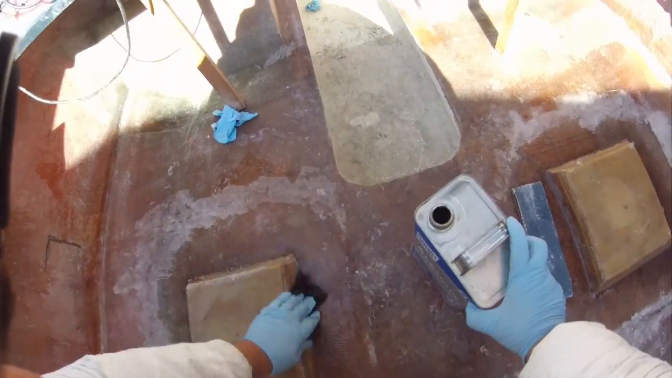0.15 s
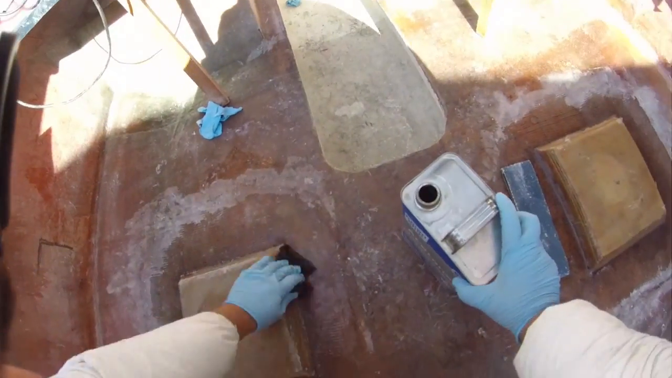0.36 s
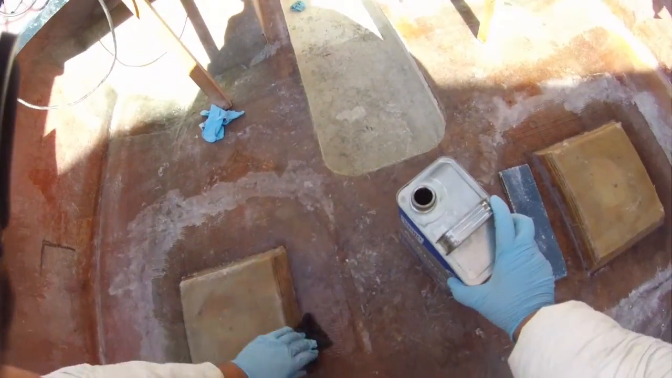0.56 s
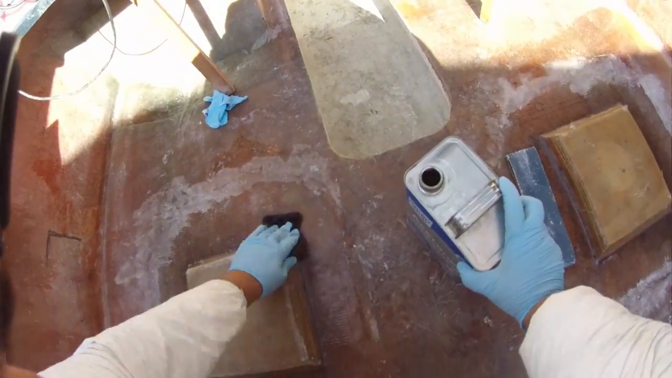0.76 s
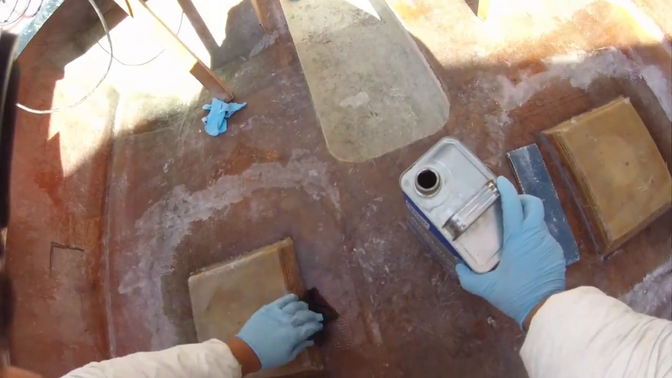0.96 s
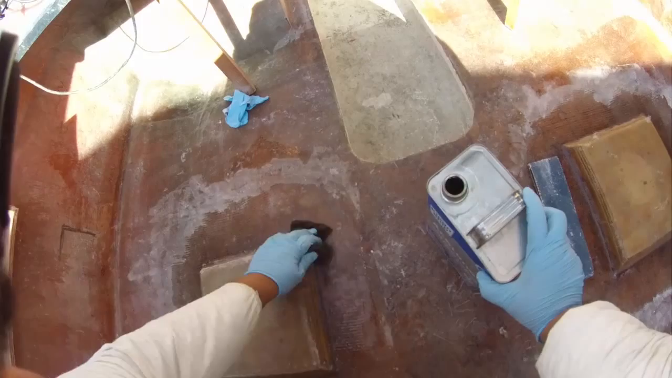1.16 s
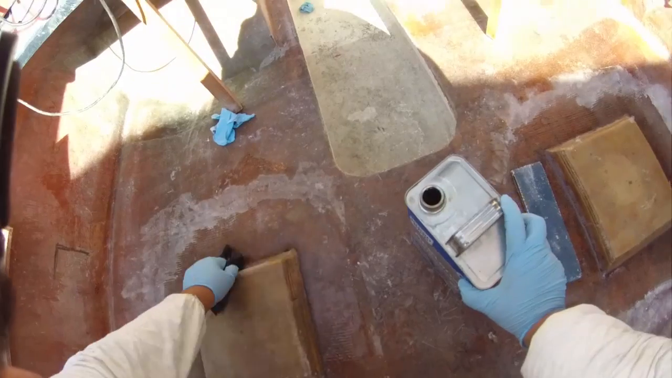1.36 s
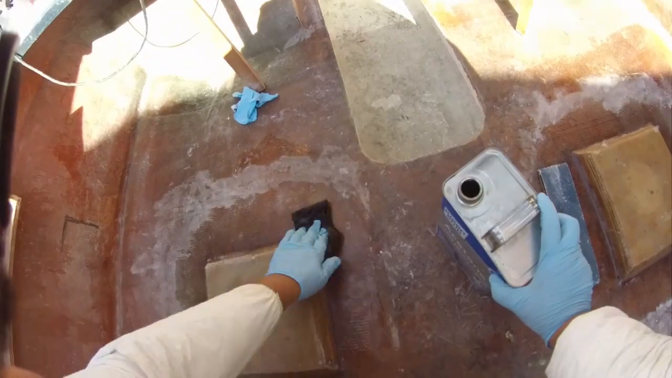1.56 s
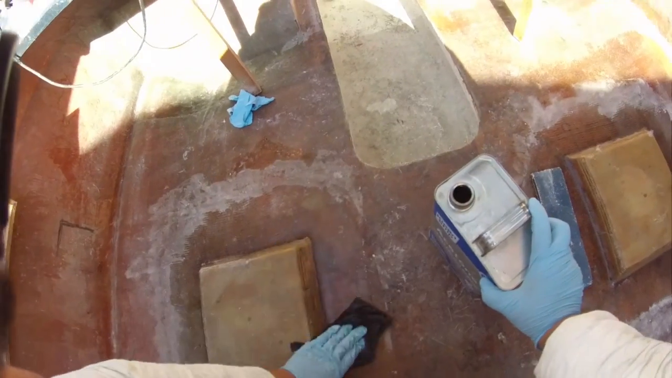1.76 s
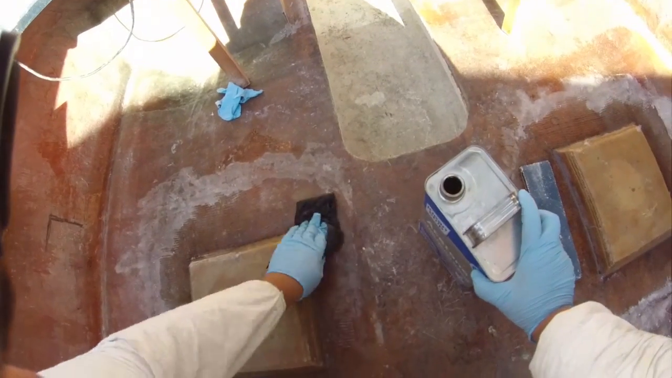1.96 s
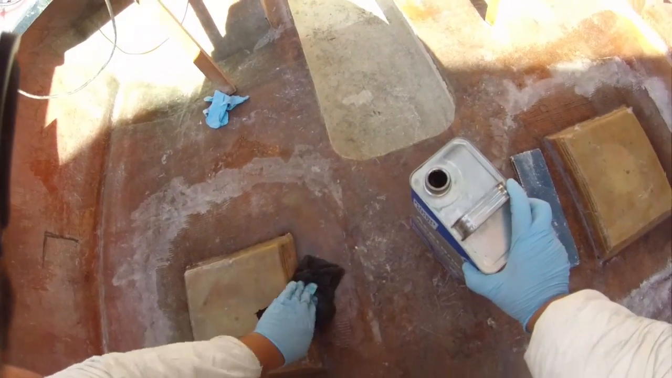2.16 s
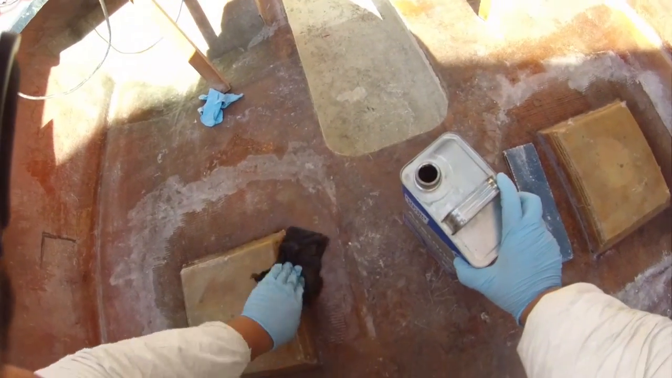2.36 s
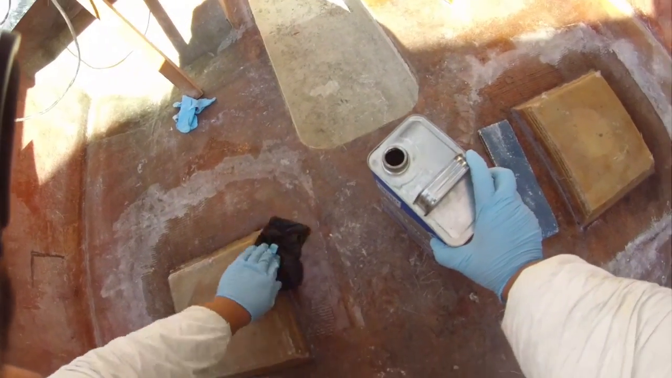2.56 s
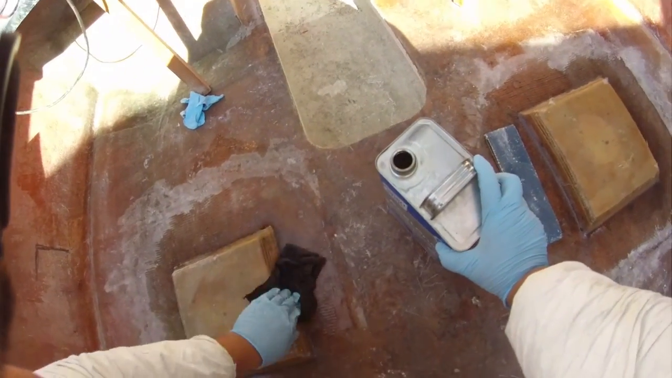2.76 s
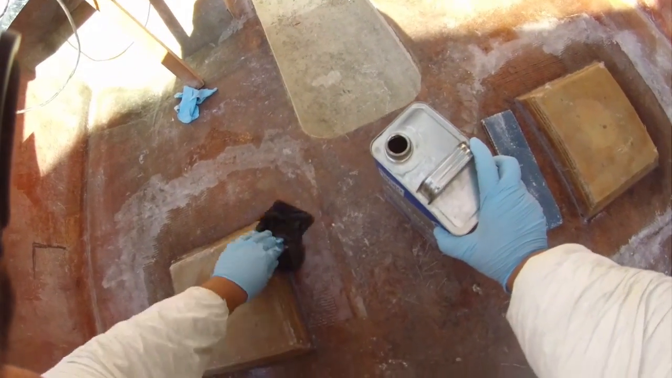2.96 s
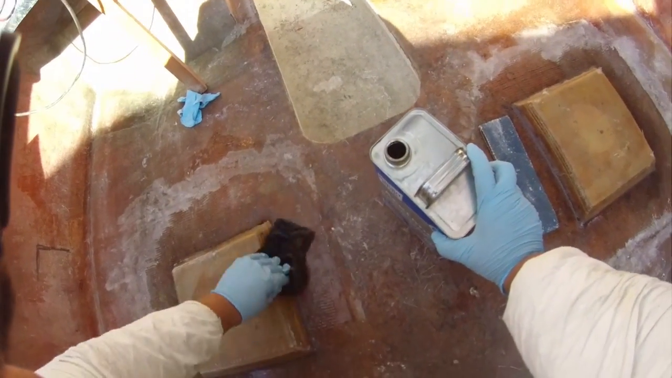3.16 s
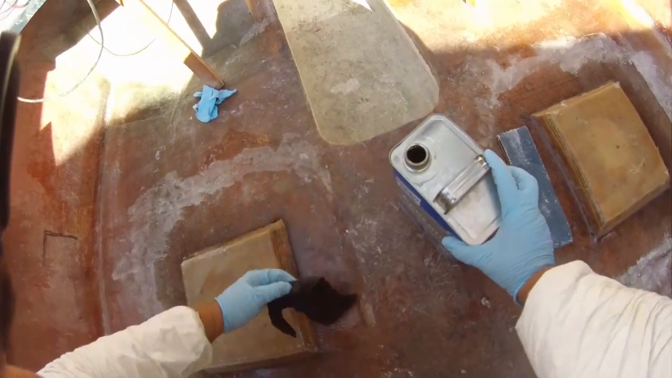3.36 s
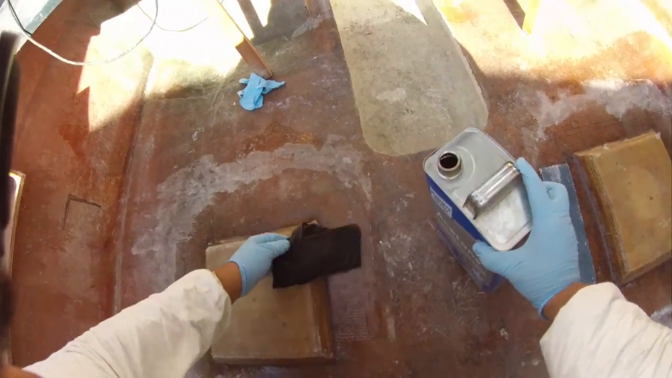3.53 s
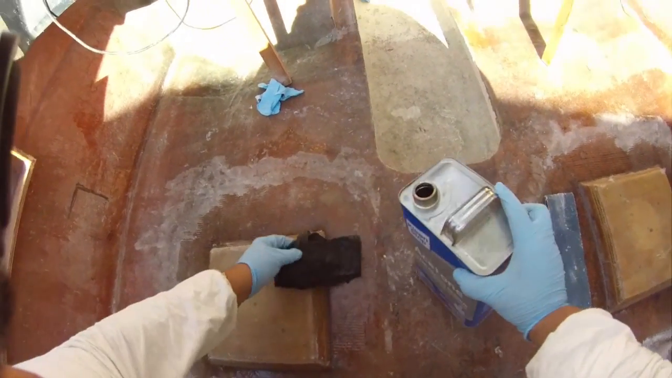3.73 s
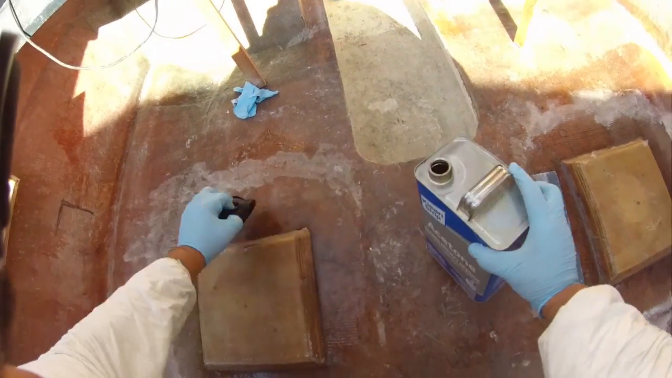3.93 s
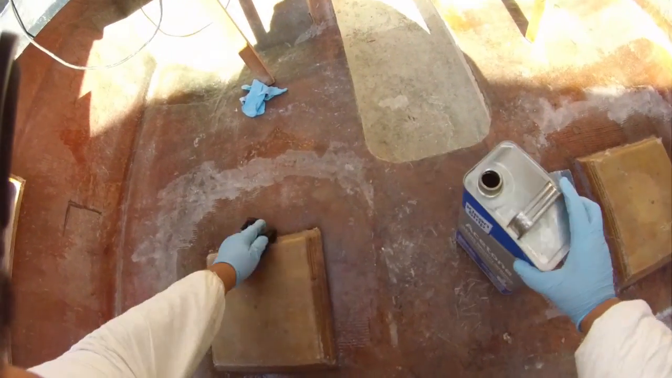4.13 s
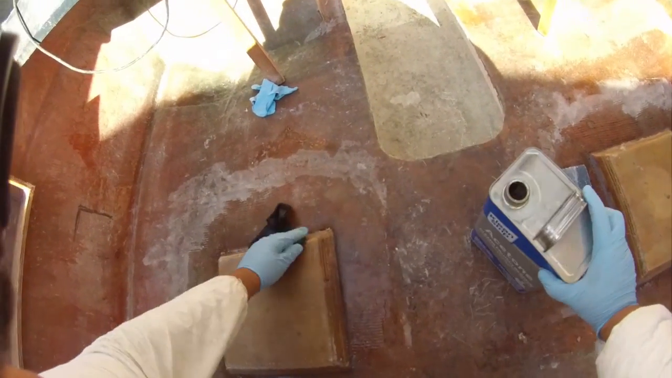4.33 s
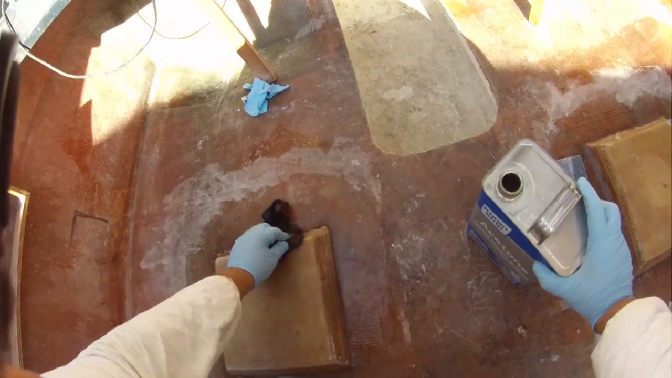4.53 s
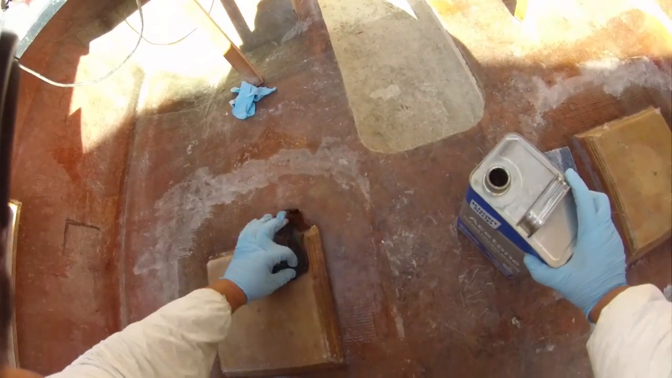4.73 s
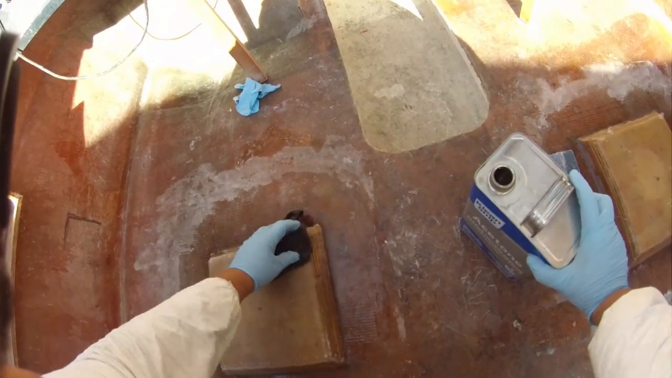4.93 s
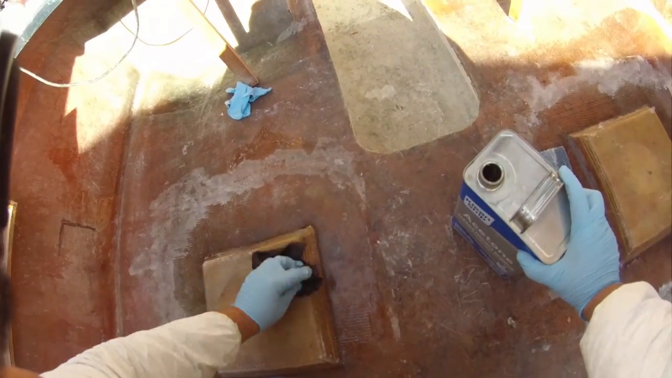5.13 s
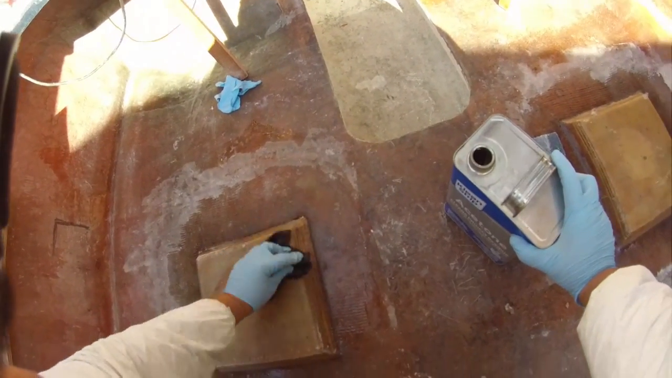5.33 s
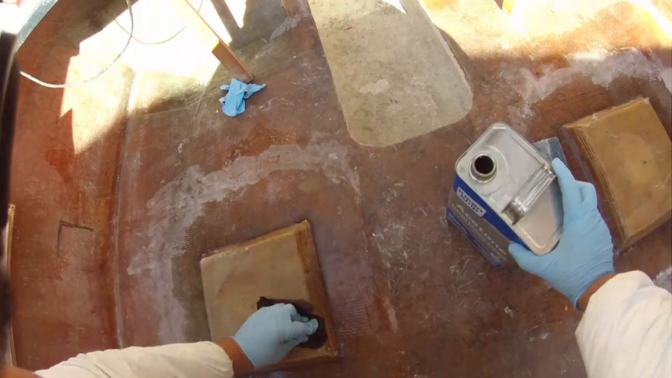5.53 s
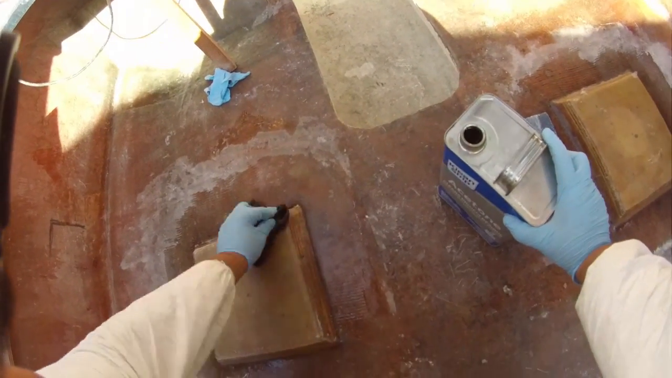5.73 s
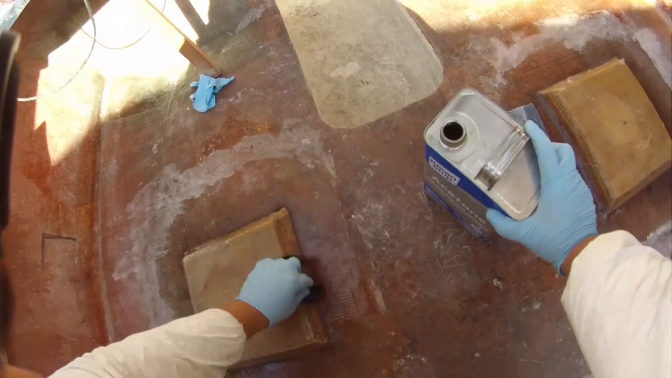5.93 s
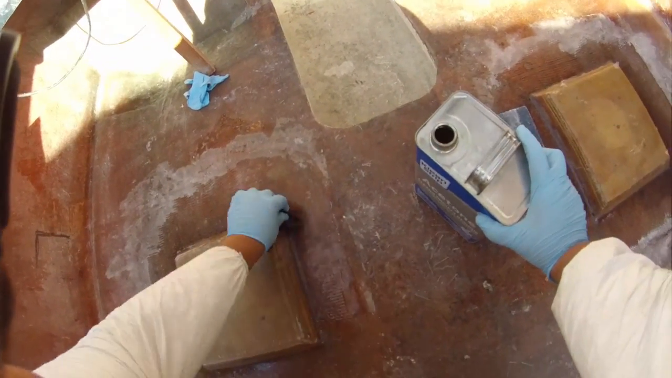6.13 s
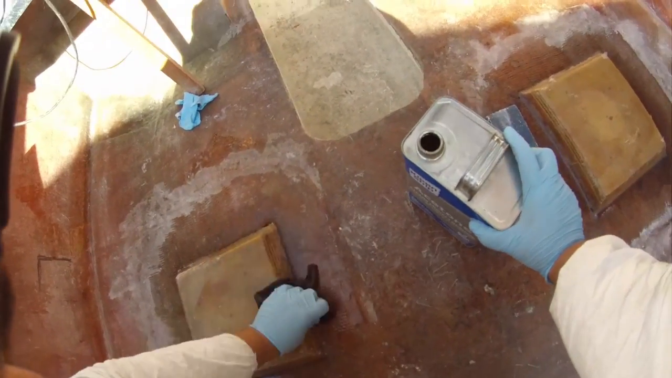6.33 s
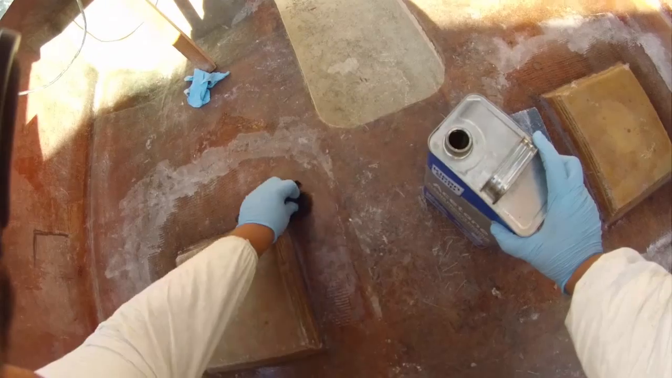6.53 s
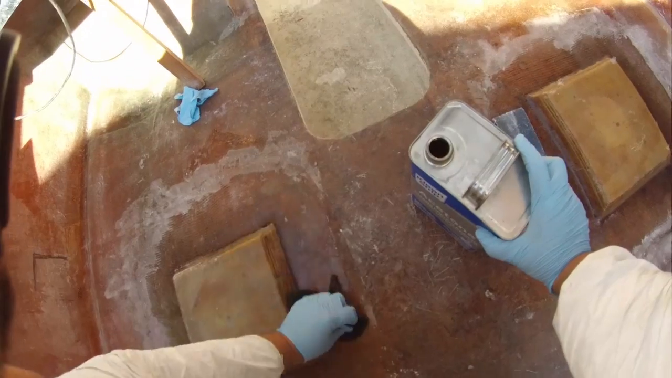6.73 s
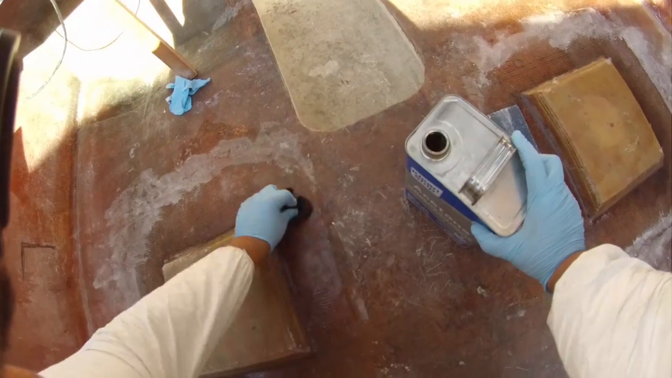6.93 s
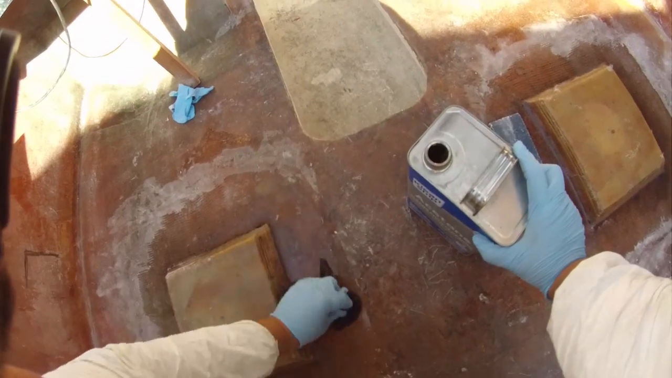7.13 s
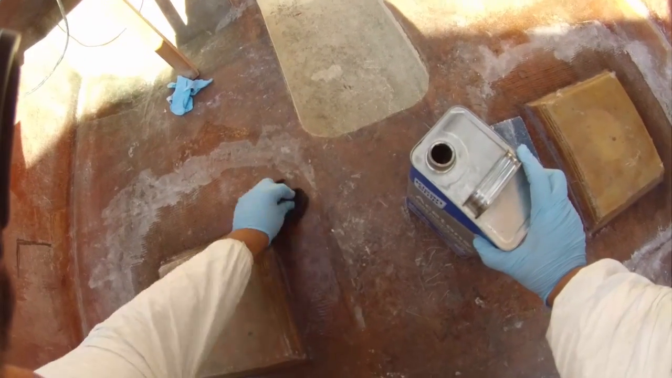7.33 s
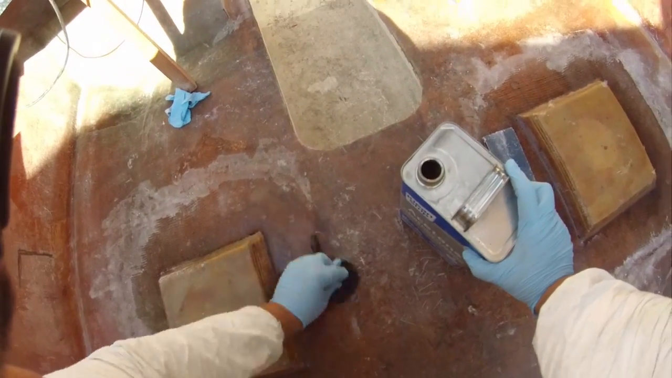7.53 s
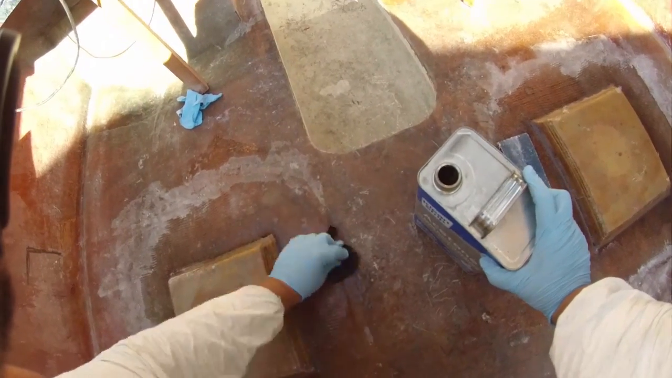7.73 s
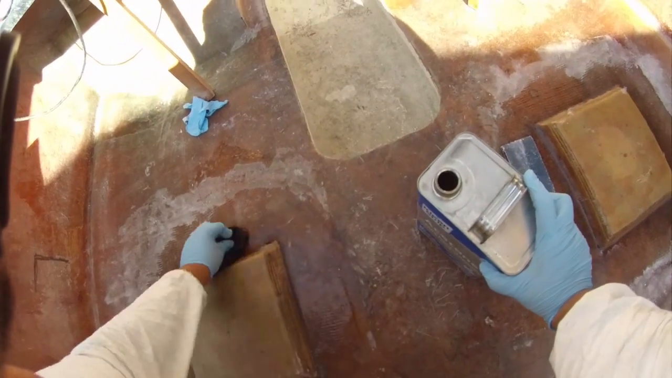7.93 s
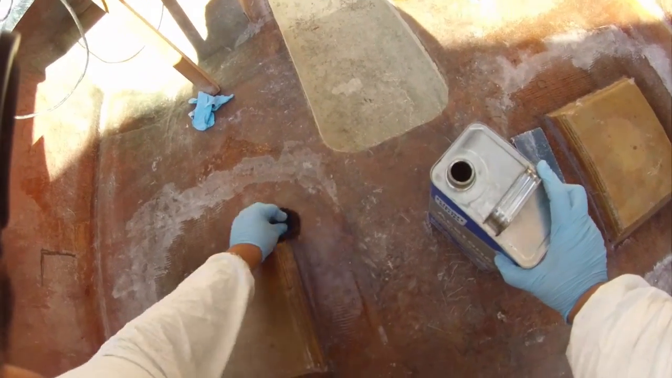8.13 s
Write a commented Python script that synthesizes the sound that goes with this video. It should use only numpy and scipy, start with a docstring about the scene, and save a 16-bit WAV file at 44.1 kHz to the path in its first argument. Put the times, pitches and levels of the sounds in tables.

```python
"""Inside a bare boat hull, a rag rubs quickly back and forth over a wooden plate, heard by one microphone.
Friction makes the hiss and rasp: countless fibres catch on the grain and slip. Between two runs of strokes
the rag is refolded and snaps. Something knocks on the hull, which booms and rings in its damped modes.
Under it lie the rumble and hiss of the yard and, at first, a low drone that may be a distant engine."""
import sys
import numpy as np
from scipy import signal
from scipy.fft import rfft, irfft
from scipy.io import wavfile

SR = 44100
rng = np.random.default_rng(int(sys.argv[2]) if len(sys.argv) > 2 else 0)


def put_to_file(sound):
    """Save the sound as 16-bit audio at rate SR, in the file named by the first command-line argument."""
    columns = np.atleast_2d(sound).T  # one column per channel
    safe = np.clip(columns, -1, 1)
    whole_steps = np.round(safe * 32767)
    wavfile.write(sys.argv[1], SR, whole_steps.astype(np.int16))


N = 360738


def from_db(db):
    """Decibels to amplitude ratio."""
    return 10 ** (np.asarray(db) / 20)


def rms_one(x):
    """Normalisation to unit rms."""
    return x / np.sqrt(np.mean(x ** 2) + 1e-20)


def in_time(rows):
    """Linear interpolation of each column against the first, time; one value a sample."""
    times_s, *columns = np.transpose(rows)
    return [np.interp(np.arange(N) / SR, times_s, column) for column in columns]


def drift(corner_hz):
    """Random modulation: low-passed noise of about unit spread."""
    step = 40
    pole = np.exp(-2 * np.pi * corner_hz * step / SR)
    noise = rng.standard_normal(N // step + 2002)
    slow = signal.lfilter([1], [1, -2 * pole, pole * pole], noise)[2000:]
    return np.interp(np.arange(N) / step, np.arange(len(slow)), rms_one(slow))


def coloured(x, spectrum):
    """Spectral shaping: a flat excitation takes on a table's spectrum, at unit rms."""
    hz = np.maximum(np.arange(N // 2 + 1) * SR / N, 1)
    points_hz, points_db = np.transpose(spectrum)
    shape_db = np.interp(np.log(hz), np.log(points_hz), points_db, left=-70, right=-70)
    return rms_one(irfft(rfft(x) * from_db(shape_db), N))


def ring(force, hz, t60_s):
    """Damped harmonic oscillator: a unit impulse starts a decaying sine of height 1."""
    r, w = from_db(-60 / (t60_s * SR)), 2 * np.pi * hz / SR
    return signal.lfilter([0, np.sin(w)], [1, -2 * r * np.cos(w), r * r], force + 1e-18)


# Spectra of the yard's hiss and rumble: frequency_hz, density_db
YARD_HISS = [(150, 1.5), (315, 1), (550, -0.5), (1070, -2.5), (2500, -7), (5400, -15.5), (10000, -17),
             (15600, -21)]
YARD_RUMBLE = [(12, 9), (25, -4), (70, -0.5), (125, -8), (200, -13), (400, -24.5)]
# Slow swells of the restless rag and the yard: time_s, rustle_db, hiss_gain_db, rumble_gain_db
SWELLS = [(0.0, -49, 8.5, 11.5), (.1, -51.5, 6, 7.5), (.42, -74, 3, 6), (1.14, -64, .5, 2.5),
          (1.7, -58, 1, 1.5), (2.2, -67, 0, 1.5), (3.5, -65, 1.5, 3.5), (3.71, -63, 5, 5.5),
          (4.24, -54.5, 5, 8), (4.69, -62, 4.5, 6.5), (5.0, -63, 2, 0), (5.3, -70, -1.5, 0),
          (6.0, -69, 0, 0.5), (6.5, -68, 0, 1.5), (6.9, -59, 1, 0), (7.6, -74, 0, 0.5), (8.18, -54, 1.5, 1)]

def yard():
    """Ambient noise: a broad hiss and a low rumble under slow amplitude modulation."""
    _, hiss_db, rumble_db = in_time(SWELLS)
    hiss = from_db(-48 + hiss_db + drift(2.3)) * coloured(rng.standard_normal(N), YARD_HISS)
    rumble_gain = from_db(-43.5 + rumble_db + 0.42 * drift(12) + 0.92 * drift(3))
    return hiss + rumble_gain * coloured(rng.standard_normal(N), YARD_RUMBLE)


# Tones of the drone: pitch_hz, start_s, end_s, start_level_db, end_level_db
DRONE_TONES = [(95.7, 0.033, 1.04, -42.5, -34.5), (124, 0.13, 1.05, -39.5, -44),
               (204, 0.7, 1.01, -48, -46.5)]

def drone(edge_s=0.052, sag_hz_per_s=6):
    """Amplitude and frequency modulation: three low tones swell in, waver, sag and fade."""
    tones, t = 0, np.arange(N) / SR
    for pitch_hz, start_s, end_s, *ends_db in DRONE_TONES:
        gate = .25 * (1 + np.tanh((t - start_s) / edge_s)) * (1 - np.tanh((t - end_s) / edge_s))
        level_db = np.interp(t, [start_s, end_s], ends_db) + 2.5 * drift(7.6)
        hz = pitch_hz - sag_hz_per_s * (t - (start_s + end_s) / 2) + 3 * drift(2.8)
        tones += gate * from_db(level_db) * np.sin(2 * np.pi * np.cumsum(hz) / SR)
    return tones


def contact_gain(hz, cutoff_hz, damping_db):
    """Contact filtering: the blow drives little above its cutoff, and damping acts most on the lows."""
    return from_db(-damping_db / (1 + (hz / 1500) ** 2)) / (1 + (hz / cutoff_hz) ** 2)


# Prominent modes of the hull panels: pitch_hz, level_db, t60_s
PANEL_MODES = [(266.9, -7.5, 0.33), (313.7, 1, 0.28), (346.5, 2.5, 0.058), (423, -0.5, 0.33),
               (451.4, -1.5, 0.12), (513, -16.5, 0.096), (580, -1, 0.11), (674, -12, 0.4), (908, -14, 0.26),
               (885, -12, 0.2), (1020, -33, 0.23), (1273, -10, 0.083), (1230, -9, 0.2), (1485, -14.5, .18),
               (1914, -14, 0.1), (2440, -23, 0.11), (2780, -31, .14)]

def panel_modes(settled, cutoff_hz, damping_db):
    """Modal superposition: an impulse drives each mode, as does faint noise until the contact settles."""
    modes, click = 0, signal.unit_impulse(len(settled))
    for hz, level_db, t60_s in PANEL_MODES:
        force = 0.8 * rng.choice([-1, 1]) * click
        force += 0.015 * rng.standard_normal(len(settled)) * (1 - settled)
        gain = from_db(level_db + rng.normal(0, 0.59)) * contact_gain(hz, cutoff_hz, damping_db)
        modes += gain * ring(force, hz, t60_s)
    return modes


# Dense panel modes and echoes: frequency_hz, relative_level_db, t60_s
DIFFUSE_DECAY = [(242, -3.5, 0.35), (398, -5.5, 0.41), (680, -7.5, 0.33), (1280, -9, 0.36),
                 (2500, -8, 0.31), (4540, -10, 0.22), (8000, -12, 0.16)]

def diffuse_tail(t, cutoff_hz, damping_db):
    """Modal overlap: countless close modes and echoes blur into bands of decaying noise."""
    tail = 0
    points_hz, *columns = np.transpose(DIFFUSE_DECAY)
    for hz in np.geomspace(290, 10400, 16):
        level_db, t60_s = (np.interp(np.log(hz), np.log(points_hz), column) for column in columns)
        band = signal.butter(2, [hz / 1.127, hz * 1.127], "band", fs=SR, output="sos")
        noise = rms_one(signal.sosfilt(band, rng.standard_normal(len(t))))
        envelope = from_db(level_db - 0.5 - 60 * t / t60_s)
        tail += envelope * contact_gain(hz, cutoff_hz, damping_db) * noise
    return tail


# Modes of the whole hull: pitch_hz, t60_s
BOOM_MODES = [(108, 0.23), (128, 0.32)]

def hull_boom(t, rise_s=0.0091):
    """Low-order resonance: the hull vibrates as a whole, building up later than its panels."""
    click = signal.unit_impulse(len(t))
    return sum(ring(click, hz, t60_s) for hz, t60_s in BOOM_MODES) * np.minimum(t / rise_s, 1)


# Blows on the hull: start_s, blow_db, cutoff_hz, crack_hz, crack_db, hum_hz, hum_db,
# settle_s, damping_db (negative lifts the lows), boom_db
HULL_BLOWS = [(0.0, -30.5, 1180, 700, -43, 323, -38, 0.039, 1.5, -41),
              (.241, -44, 890, 510, -46, 268, -40, 0.083, -1, -53),
              (3.5744, -18, 4160, 2570, -13, 330, -13, 0.095, 8, -32.5),
              (3.587, -35, 3000, 2780, -11, 426.5, -30, .22, 1, -61),
              (4.0582, -13, 1240, 870, -7, 359, -9.5, 0.04, 3.5, -24.5),
              (4.11, -29, 500, 500, -42, 264, -25.5, 0.116, 11, -50),
              (4.218, -35, 706, 494, -32, 290, -43, 0.072, -6, -53),
              (4.261, -27, 500, 400, -22, 327, -30, 0.024, 2, -58),
              (4.281, -21.5, 1050, 1530, -20, 438, -16, 0.03, 0.5, -25),
              (4.687, -31.5, 803, 900, -39, 417.4, -33, 0.082, 1, -32),
              (5.569, -48, 600, 500, -41, 404, -39, 0.036, 0, -51),
              (6.094, -39, 690, 480, -41, 426, -33, 0.018, 2.5, -35.5),
              (6.772, -40, 800, 507, -43, 307, -37, 0.038, 7, -40.5),
              (7.171, -47.5, 700, 503, -42, 302, -41, 0.025, 7, -64),
              (7.714, -54, 604, 397, -50, 312, -42.5, 0.054, 6, -57),
              (7.993, -38, 1000, 690, -36, 390, -47, .05, 4, -42)]

def knocks(hum_t60_s=0.88, highpass_hz=161):
    """Impact excitation: a blow cracks and rings the hull; the struck panel hums until contact settles."""
    panels, booms = np.zeros(N), np.zeros(N)
    span = round(.7 * SR)
    t, click = np.arange(span) / SR, signal.unit_impulse(span)
    for (start_s, blow_db, cutoff_hz, crack_hz, crack_db, hum_hz, hum_db,
         settle_s, damping_db, boom_db) in HULL_BLOWS:
        settled = .5 + .5 * np.tanh((t - settle_s) / .006)
        body = panel_modes(settled, cutoff_hz, damping_db * settled)
        body += diffuse_tail(t, cutoff_hz, damping_db * settled)
        body *= from_db(blow_db) * np.minimum(t / 0.0023, 1)
        burst = 0.068 * rng.standard_normal(span) * from_db(-60 * t / 0.043)
        crack = from_db(crack_db) * ring(click + burst, crack_hz, t60_s=15.3 / crack_hz)
        hum_envelope = (1 - np.exp(-t / 0.011)) * from_db(hum_db - 60 * t / hum_t60_s - 40 * settled)
        hum = hum_envelope * np.sin(2 * np.pi * hum_hz * t)
        at = round(start_s * SR)
        panels[at:at + span] += (body + crack + hum)[:N - at]
        booms[at:at + span] += from_db(boom_db) * hull_boom(t)[:N - at]
    highpass = signal.butter(4, highpass_hz, "high", fs=SR, output="sos")
    return signal.sosfilt(highpass, panels + 1e-18) + booms


# Snaps of the cloth and glove: start_s, relative_level_db
CLOTH_SNAPS = [(2.8624, -53), (3.716, -42.5), (3.8064, -43), (3.9644, -50.5), (4.0094, -45.5), (4.084, -46),
               (4.095, -44), (4.7354, -34), (4.756, -39.5), (4.762, -42), (4.7804, -55), (4.9044, -47),
               (5.0374, -57)]

def snap_envelope(rise_s=0.0021, t60_s=0.056):
    """Transient envelopes: each snap of cloth rises sharply and decays exponentially."""
    snaps, t = np.zeros(N), np.arange(round(.1 * SR)) / SR
    for start_s, level_db in CLOTH_SNAPS:
        at = round(start_s * SR)
        snaps[at:at + len(t)] += from_db(level_db - 60 * t / t60_s) * np.minimum(t / rise_s, 1)
    return snaps


# Strokes of the rag: start_s, length_s, relative_level_db, swell_db, brightness_db, rasp_gain_db
RAG_STROKES = [(0.0, 0.083, -46, -1.5, -2, -6), (0.169, .11, -39, 2.5, 1.5, -5.5),
               (0.342, 0.13, -44.5, -5, 0, -4.5), (0.522, 0.089, -43, 1.5, 1, -5),
               (0.669, .12, -44, -0.5, -0.5, -2), (0.845, 0.13, -46.5, 4, -3, -2),
               (1.021, 0.084, -48, -3, -2, -3), (1.177, .082, -56.5, 6, 6, -14),
               (1.315, 0.095, -46, 3, -3, -7), (1.473, 0.14, -51, -6.5, -4, -0.5),
               (1.666, 0.12, -45.5, 6, -2, -5.5), (1.864, 0.11, -48, 0.5, 0, -2),
               (2.062, 0.12, -55, 1, 7, -12), (2.244, 0.083, -49.5, -1, -1, -1),
               (2.398, 0.086, -47.5, 3, 3, -3.5), (2.569, 0.096, -48, -2, 1, -8.5),
               (2.755, .094, -51.5, 1, 3, -4), (2.948, .13, -50, -2, 0, -5),
               (3.168, .16, -53, 0.5, 0, -2.5), (4.624, .11, -50.5, -2, 1, -7.5),
               (5.136, 0.15, -47.5, 1, 3, -7), (5.331, 0.12, -46.5, -4, 2, -3.5),
               (5.487, 0.11, -45.5, -0.5, 1, -4), (5.638, .13, -48, 0.5, 3, -4.5),
               (5.8, 0.12, -48.5, -1, 0, -4), (5.97, 0.21, -52.5, -2, -3, -4.5),
               (6.212, .16, -53.5, 0, -2, -7), (6.454, .13, -52, -2.5, 0, -0.5),
               (6.692, 0.098, -47, 5, 4, -0.5), (6.88, .12, -47.5, 2, 0, -4),
               (7.11, 0.095, -44.5, -2, 5, -3), (7.275, 0.16, -45.5, -3, -1, -4.5),
               (7.476, .17, -44.5, 2, 1, -8), (7.702, .15, -45.5, -1.5, 2, -8),
               (7.853, .12, -51.5, -1, -4, -4), (7.97, 0.069, -47, 2, -5, -2),
               (8.09, 0.065, -46, 0, 4, -4.5)]

def stroke_envelopes(rise_s=0.027, fall_s=0.032, dulling_db=1.5):
    """Friction noise follows sliding speed: a stroke speeds up, holds and brakes, rasping near midway."""
    hiss, sizzle, rasp = np.zeros((3, N))
    time_s = np.arange(N) / SR
    for start_s, length_s, level_db, swell_db, brightness_db, rasp_db in RAG_STROKES:
        near = slice(max(round((start_s - .1) * SR), 0), round((start_s + length_s + .1) * SR))
        t = time_s[near] - start_s
        progress = np.clip(2 * t / length_s - 1, -.5, .5)
        speed = .25 * (1 + np.tanh(2 * t / rise_s)) * (1 - np.tanh(2 * (t - length_s) / fall_s))
        level = speed * from_db(level_db + swell_db * progress)
        tilt = from_db((brightness_db - dulling_db * progress) / 2)
        hiss[near] += level / tilt
        sizzle[near] += level * tilt
        rasp[near] += level * from_db(rasp_db - 14 * (t / length_s - .6) ** 2)
    return hiss, sizzle, rasp


def fibres(slips_per_s, spread_db):
    """Shot noise: fibres catch and let go at random, in dense clicks of uneven size."""
    sizes = from_db(spread_db * np.minimum(rng.exponential(1, N), 4)) * rng.standard_normal(N)
    return sizes * (rng.random(N) < slips_per_s / SR)


# Friction spectra of the fine hiss, bright sizzle and coarse rasp: frequency_hz, density_db
RAG_HISS = [(3000, -33), (4800, -4.5), (6500, -2), (8500, -1), (10500, -3), (13000, -25)]
RAG_SIZZLE = [(6500, -16.5), (8800, -6), (10800, -4), (12300, -7), (14000, -13.5), (15800, -20)]
RAG_RASP = [(300, -32), (1200, 4.5), (3000, 7), (4500, 7), (6000, -5), (9000, -15)]

def rag():
    """Stick-slip friction: fibres catch on the grain of the wood under a wavering pressure."""
    hiss, sizzle, rasp = stroke_envelopes()
    snaps, pressure = snap_envelope(), drift(22)
    rustle = from_db(in_time(SWELLS)[0])   # the rag never quite rests
    hiss = np.hypot(hiss * from_db(-2.5), rustle) * from_db(0.29 * pressure + 1.3 * drift(16))
    sizzle = np.hypot(sizzle * from_db(-1.5), rustle) * from_db(0.48 * pressure + 1.15 * drift(38))
    rasp *= from_db(2 * drift(18))
    return ((hiss + snaps) * coloured(fibres(14000, spread_db=1), RAG_HISS)
            + (sizzle + snaps) * coloured(fibres(14000, spread_db=-4), RAG_SIZZLE)
            + (rasp + .5 * snaps) * coloured(fibres(5000, spread_db=0.5), RAG_RASP))


def scene():
    """Superposition: all sources add at one microphone, alike in both channels."""
    mono = yard() + rag() + knocks() + drone()
    return np.array([mono, mono])


def record(dry):
    """Band limiting and DC offset: the top is cut steeply; the converter sits slightly off zero."""
    cutoff_hz, dc_offset = 15700, -.0011
    lowpass = signal.ellip(18, .5, 75, cutoff_hz, fs=SR, output="sos")
    return signal.sosfilt(lowpass, dry) + dc_offset


dry = scene()
out = record(dry)
put_to_file(out)
```